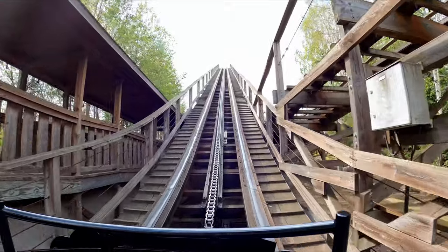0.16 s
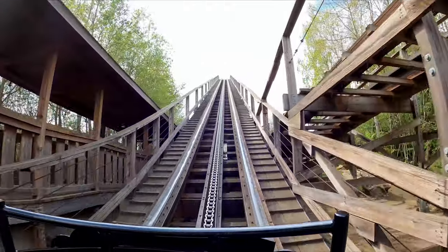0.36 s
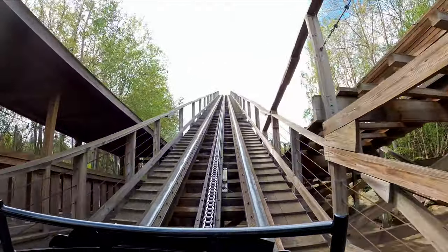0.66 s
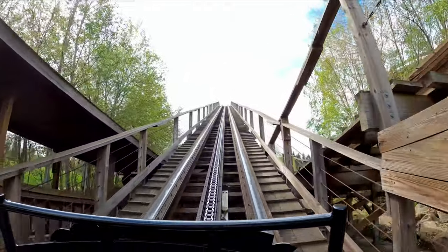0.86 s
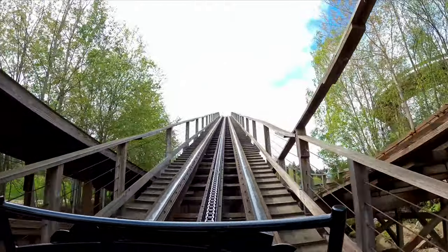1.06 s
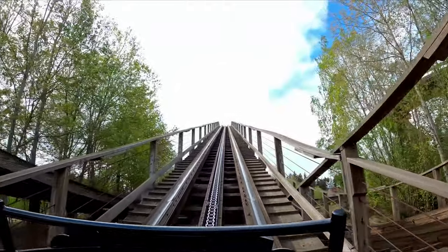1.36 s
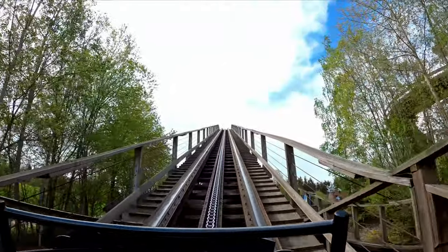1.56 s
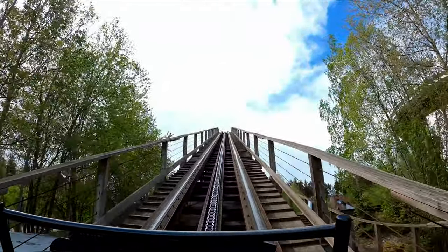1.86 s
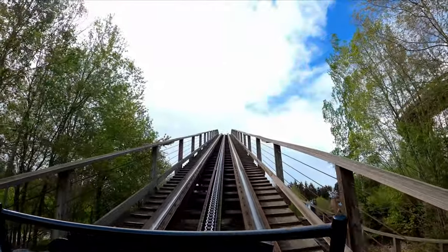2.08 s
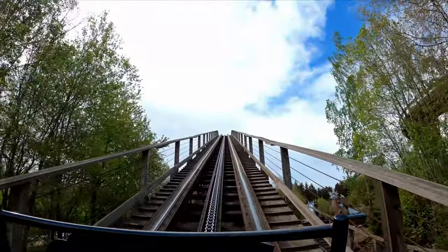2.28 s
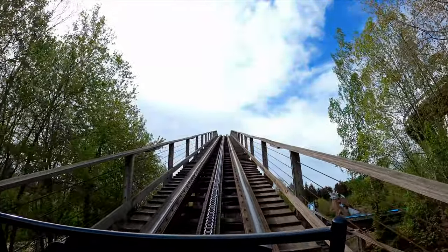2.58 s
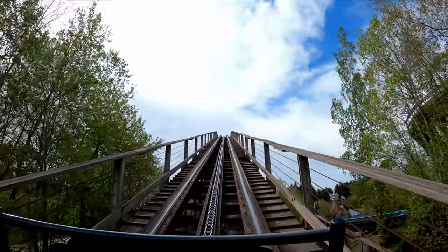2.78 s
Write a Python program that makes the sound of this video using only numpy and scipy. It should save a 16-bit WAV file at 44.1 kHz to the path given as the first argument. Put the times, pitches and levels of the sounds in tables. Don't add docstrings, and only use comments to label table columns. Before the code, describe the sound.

A wooden roller coaster car rumbles and booms over timber track with loose rattling fittings and low wind buffeting, then fast metal ratchet clacks and chain clatter take over; outdoors, close muffled onboard microphone.

```python
import sys
import numpy as np
from scipy import signal
from scipy.fft import rfft, irfft
from scipy.io import wavfile
from scipy.ndimage import uniform_filter1d, minimum_filter1d

SR = 44100
rng = np.random.default_rng(int(sys.argv[2]) if len(sys.argv) > 2 else 0)


def transcribe(signal):
    frames = np.atleast_2d(signal).T
    limited = np.clip(frames, -1, 1)
    pcm = np.round(limited * 32767).astype(np.int16)
    wavfile.write(sys.argv[1], SR, pcm)


def rack_gain(trim_db):
    fader = np.asarray(trim_db, float)
    return 10 ** (fader / 20)


N = 129213


def rows(table):
    return np.array(table, float).T


def unit(x):
    return x / np.sqrt(np.mean(x ** 2))


def curve(table):
    s, db = rows(table)
    return rack_gain(np.interp(np.arange(N) / SR, s, db))


def walk(rate_hz):
    hold = int(SR / rate_hz)
    steps = np.repeat(rng.standard_normal(N // hold + 2), hold)
    return unit(uniform_filter1d(uniform_filter1d(steps, hold), hold)[:N])


def high_pass(x, order, hz):
    return signal.sosfilt(signal.butter(order, hz, "highpass", fs=SR, output="sos"), x)


def running(f, x):
    return f(np.concatenate([x[-SR // 4:], x]))[-N:]


def colour(x, points, tilt_db=0.):
    hz, db = rows(points)
    f = np.maximum(np.arange(4097) * SR / 8192, 5)
    gain_db = np.interp(np.log(f), np.log(hz), db)
    gain_db -= 12 * np.maximum(np.log2(hz[0] / f), 0)
    gain_db += tilt_db * np.maximum(np.log2(f / 2000), 0)
    cepstrum = irfft(gain_db * np.log(10) / 20)
    cepstrum[1:4096] *= 2
    cepstrum[4097:] = 0
    return signal.fftconvolve(x, irfft(np.exp(rfft(cepstrum))))[:len(x)]


def ring(x, hz, width_hz):
    return signal.lfilter(*signal.iirpeak(hz, hz / max(width_hz, 1), SR), x)


def modes(x, table):
    out = 0
    for hz, db, t60 in table:
        flicker_db = 2 * walk(13)
        out = out + ring(x * rack_gain(db + flicker_db), hz, np.log(1000) / np.pi / t60)
    return out


def grains(rate_hz, scatter_db):
    chance, sign, size = rng.random((3, N))
    knocks = (chance < rate_hz / SR) * np.sign(sign - .5) * rack_gain(-scatter_db * np.log(size + 1e-9))
    return unit(knocks) + .5 * rng.standard_normal(N)


def blows(times, db, attack_s, decay_s):
    power = np.bincount((times * SR).astype(int), rack_gain(2 * db), N)
    for s in (attack_s, decay_s / 2):
        power = signal.lfilter([1], [1, -np.exp(-1 / (max(s, 1e-4) * SR))], power)
    return np.sqrt(power / (max(attack_s, 1e-4) * SR))


def struck(env, bright, body, table, ring_db, low_hz):
    def steel(x):
        return colour(x + rack_gain(ring_db) * modes(x, table), body)

    noise = grains(2500, 0.7)
    top = high_pass(bright * rng.standard_normal(N), 4, 5000)
    return steel(env * noise + top) / np.std(high_pass(steel(noise), 2, low_hz))


def pings(table, attack_s, decay_s, width_hz):
    noise = rng.standard_normal(N)
    out = np.zeros(N)
    for s, hz, db in table:
        note = unit(ring(ring(noise, hz, width_hz), hz, 2 * width_hz))
        out += blows(np.array([s]), np.array([db]), attack_s, decay_s) * note
    return out


def rumble():
    # t/s, level/dB
    wheel_load = [(0.0, -14), (.45, -15.5), (0.75, -14.5), (1.3, -15.5), (2.9, -17.5)]
    # f/Hz, level/dB
    timber = [(60, -4.5), (290, -5), (600, -14.5), (1100, -19.5), (2000, -32.5), (4200, -45.5), (7000, -63),
              (13000, -79.5)]
    # f/Hz, width/Hz, level/dB
    booms = [(102, 14.4, 2), (163.2, 23, -1.5), (241, 9.9, -2), (290, 4.1, 1.5), (345, 5.7, -11.5),
             (474, 19, -8.5), (975, 690, -17)]
    load = curve(wheel_load)
    low_pass = signal.butter(4, 1300, fs=SR, output="sos")
    bumps = signal.sosfilt(low_pass, grains(400, 3))
    fade_db = -4 * np.arange(N) / SR
    boom = np.zeros(N)
    for hz, width_hz, db in booms:
        gain = rack_gain(db + 2.64 * walk(9.05) + (hz < 120) * fade_db)
        boom += gain * running(lambda x: ring(x, hz, width_hz), bumps)
    uneven = rng.standard_normal(N) * rack_gain(1.37 * walk(14))
    roll = unit(running(lambda x: colour(x, timber), uneven))
    return rack_gain(-2.0) * (roll * load ** 0.61 * rack_gain(-6) + rack_gain(-4.5) * unit(boom) * load)


def wind():
    # t/s, level/dB
    gusts = [(0.0, -24), (0.12, -17.5), (.9, -21.5), (1.7, -22), (2.28, -20), (2.42, -41), (2.93, -24)]
    band = signal.butter(3, [12, 66.3], "bandpass", fs=SR, output="sos")
    buffet = signal.sosfilt(band, rng.standard_normal(N))
    return unit(buffet) * curve(gusts) * rack_gain(-4 + 4.0 * walk(7.9))


def rattles():
    # t/s, peak/dB, brightness/dB
    knocks = [(0.028, -17, -21), (0.0594, -15, -28), (0.1022, -17.5, -44), (0.1815, -28.5, -40),
              (0.2194, -25, -27), (0.2573, -20, -24), (0.31, -26, -28), (0.3421, -24, -22),
              (0.3744, -26, -17), (0.4194, -30, -14), (0.4708, -19, -32), (0.5344, -21.5, -31),
              (0.6144, -23, -23), (0.665, -25.5, -20), (0.7327, -25, -22), (0.7966, -39, -30),
              (0.8444, -37, -35), (0.95, -22, -25), (0.9744, -38, -17.5), (1.1694, -25, -25),
              (1.1894, -23, -30), (1.2244, -31, -26), (1.263, -22.5, -44)]
    # t/s, level/dB
    shake = [(0, -31.5), (.05, -54), (.17, -52), (.28, -41.5), (.4, -38), (.52, -35.5), (.6, -36.5),
             (.75, -36.5), (.82, -41), (.93, -42), (1.1, -47.5), (1.25, -42.5), (1.4, -47.5), (1.6, -40)]
    # f/Hz, level/dB
    fitting = [(1200, 1), (2100, 2), (4200, -6.5), (5000, -15.5), (6400, -24), (8500, -28.5),
               (11000, -40.5), (15000, -85.5)]
    # f/Hz, level/dB, t60/s
    fitting_modes = [(2150, 7.5, 0.051), (3900, 2.5, 0.0017), (5160, 4.5, 0.0051), (6100, 3.5, 0.011)]
    # t/s, f/Hz, peak/dB
    clear_rings = [(.028, 3900, -35.5), (.22, 2780, -34), (.256, 3850, -32.5), (.268, 3930, -38),
                   (.268, 5260, -43), (.308, 3910, -37), (.385, 3680, -32), (.42, 3960, -35),
                   (.47, 3800, -38.5), (.538, 2150, -30), (.545, 3840, -34), (.555, 5400, -37),
                   (.62, 5050, -36.5), (.631, 5180, -37), (.625, 3450, -33), (0.665, 2120, -40),
                   (.68, 2130, -34), (.73, 4100, -38), (0.955, 2630, -27.5), (.997, 3930, -40.5),
                   (1.185, 2360, -31.5), (1.2, 3900, -42), (1.265, 1920, -25.5), (1.33, 2170, -33),
                   (1.445, 3040, -27.5), (1.525, 3100, -25), (2.752, 3300, -27), (2.82, 3700, -32)]
    s, db, bright_db = rows(knocks)
    db = db - 11
    jingle = curve(shake) * rack_gain(1.03 * walk(24.47))
    env = blows(s, db, 0.0026, 0.007) + jingle
    bright = blows(s, db + bright_db + 28, 0.0061, 0.018)
    out = struck(env, bright, fitting, fitting_modes, ring_db=-5.5, low_hz=1100)
    return out + pings(clear_rings, 0.0021, 0.008, 170)


def swell(start, hz, db, rise_s):
    out = np.zeros(N)
    for s, f, gain, rise in zip(start, hz, rack_gain(db), rise_s):
        first = int(s * SR)
        t = np.arange(min(int(12 * rise * SR), N - first)) / SR
        env = (t / (2 * rise)) ** 2 * np.exp(2 - t / rise)
        out[first:][:len(t)] += gain * env * np.sin(2 * np.pi * f * t)
    return out


def joints():
    # t/s, f/Hz, peak/dB
    crossings = [(.09, 87, -20), (.18, 345, -12), (.42, 90.8, -11.5), (.63, 327, -19), (.73, 290, -7),
                 (.94, 180, -11), (.97, 262, -14), (1.03, 86, -27), (1.18, 172, -20), (1.58, 290, -12.5),
                 (1.63, 92.4, -13.5), (1.77, 568, -15.5), (1.87, 115, -12), (1.92, 290, -10.5),
                 (2.0, 73.2, -19), (2.02, 176, -33), (2.64, 155, -14), (2.72, 170.5, -9), (2.74, 223, -8.5)]
    s, hz, db = rows(crossings)
    rise_s = 1.444 / hz ** 0.65 / 8
    return swell(np.maximum(s - rise_s, 0), hz, db, rise_s)


def ticks():
    # t/s, peak/dB
    housing_ticks = [
        (.18, -65),
        (.431, -52),
        (.66, -56),
        (.953, -53),
        (.978, -56),
    ]
    s, db = rows(housing_ticks)
    return blows(s, db, .0003, .0015) * high_pass(rng.standard_normal(N), 2, 6000)


def ratchet():
    # t/s, peak/dB, brightness/dB
    clacks = [(1.42, -3, -38), (1.44, -6.5, -36), (1.4946, -6.5, -13.5), (1.519, -3, -42),
              (1.551, -7.5, -14), (1.6278, -4.5, -13), (1.6514, -4.5, -19), (1.71, -14, -26),
              (1.7344, -17, -6), (1.771, -12.5, -17), (1.8158, -8, -15), (1.8594, -1.5, -30),
              (1.9053, -11, -39), (1.9565, -5.5, -33), (2.0045, -4, -35), (2.0394, -16, -26),
              (2.0747, -2, -38), (2.1066, -16, -33), (2.1314, -11.5, -21), (2.1784, -10, -34.5),
              (2.2022, -4.5, -40), (2.2556, -9, -16.5), (2.3066, -11, -21), (2.328, -5, -20.5),
              (2.409, -6.5, -20), (2.4474, -13, -33), (2.4983, -5.5, -16), (2.548, -13, -33),
              (2.5987, -11, -11), (2.6444, -16.5, -33)]
    # t/s, peak/dB, brightness/dB
    last_clacks = [
        (2.7077, -14.5, -34),
        (2.7295, -11, -31),
        (2.7564, -23, -29),
        (2.798, -25, -21),
        (2.807, -15.5, -28),
        (2.8577, -12, -22),
    ]
    # f/Hz, level/dB
    dog = [(700, -5.5), (1450, 0.5), (3100, -11.5), (4400, -22.5), (4900, -27.5), (6500, -32), (7300, -41),
           (14000, -61)]
    steel_hz = [1000, 1250, 1410, 1620, 1902, 2126, 2520, 2880, 3260, 4255, 6350, 7970, 9380, 11100]
    # level/dB, t60/s
    steel_rings = [(-19, 0.011), (-8.5, 0.08), (6.5, 0.092), (-3.5, 0.08), (6, 0.027), (1, 0.054),
                   (-4, 0.18), (1, 0.011), (2, 0.059), (5, 0.01), (-5, 0.006), (8, 0.0078), (7, .03),
                   (-3.5, 0.033)]
    # t/s, level/dB
    chain = [(1.412, -49), (1.425, -25.5), (1.48, -25.5), (1.55, -21.5), (1.615, -26), (1.66, -21),
             (1.9, -25.5), (2.1, -26), (2.3, -23.5), (2.48, -26), (2.6, -24.5), (2.69, -25), (2.79, -32),
             (2.93, -30.5)]
    # f/Hz, level/dB
    chain_steel = [(700, -2), (1450, 1.5), (3100, -11), (4400, -23), (4900, -27.5), (6500, -28),
                   (7300, -37), (14000, -62.5)]
    steel_modes = [(hz, *level_t60) for hz, level_t60 in zip(steel_hz, steel_rings)]
    s, db, bright_db = rows(list(clacks) + list(last_clacks))
    db = db - 14.5
    env = blows(s, db, 0.003, 0.014)
    bright = blows(s, db + bright_db + 24.0, 0.0052, 0.022)
    out = struck(env, bright, dog, steel_modes, ring_db=-8.5, low_hz=1030)
    links = grains(830, 1.5) * rack_gain(1.7 * walk(22.05))
    clatter = colour(links + rack_gain(-3.5) * modes(links, steel_modes), chain_steel, tilt_db=2.0)
    return out + curve(chain) * unit(clatter)


def teeth():
    # t/s, peak/dB, f/Hz
    notes_of_teeth = [(1.4222, -10, 1420), (1.43, -15.5, 1340), (1.495, -11, 1400), (1.5195, -13, 1660),
                      (1.5497, -12.5, 1040), (1.5778, -8.5, 1210), (1.633, -10.5, 1630), (1.6566, -9, 1160),
                      (1.709, -9, 1260), (1.7324, -11, 1870), (1.7714, -11, 1700), (1.7947, -10, 1410),
                      (1.861, -9, 1060), (1.9084, -11, 1420), (1.9545, -8, 1270), (2.0048, -10.5, 1480),
                      (2.0394, -13, 1500), (2.0755, -15, 1070), (2.111, -6.5, 1390), (2.1775, -8, 1260),
                      (2.2007, -8.5, 1370), (2.2624, -9.5, 1350), (2.2904, -15, 1390), (2.307, -18, 1420),
                      (2.3283, -9, 1510), (2.398, -18, 1530), (2.4108, -11.5, 1720), (2.4433, -13.5, 1390),
                      (2.4833, -15, 993), (2.4964, -15, 1480), (2.5066, -17, 1430), (2.5396, -11, 1390),
                      (2.5734, -21, 1760), (2.6006, -8.5, 1210), (2.649, -15, 1390), (2.7093, -7.5, 1070),
                      (2.7287, -7.5, 1450), (2.7953, -12.5, 1430), (2.811, -10, 1240), (2.8238, -3.5, 1010),
                      (2.8646, -12, 1860)]
    return pings([(s, hz, db - 8) for s, db, hz in notes_of_teeth], 0.0024, 0.011, 427)


def tip():
    # t/s, peak/dB, f/Hz
    tip_rings = [(1.497, -41, 6100), (1.508, -39, 6400), (1.552, -42, 6300), (1.638, -34, 6400),
                 (1.655, -39, 6100), (1.709, -33, 6100), (1.765, -39, 6300), (2.005, -39, 6300),
                 (2.04, -42, 6260), (2.18, -39, 6240), (2.26, -40, 6200), (2.33, -41, 6200),
                 (2.415, -36.5, 6140), (2.55, -44, 6130), (2.6, -37, 6280), (2.82, -37.5, 6200)]
    return pings([(s, hz, db) for s, db, hz in tip_rings], 0.0041, 0.0059, 300)


def scene():
    steel = rattles() + ratchet() + teeth() + tip()
    t = np.arange(SR // 4) / SR
    tail = rng.standard_normal(len(t)) * np.exp(-np.log(1000) * t / 0.41) * (t > .004)
    echo = signal.fftconvolve(steel, tail / np.sqrt((tail ** 2).sum()))[:N]
    return (rumble() + wind() + steel + rack_gain(-10) * echo + joints() + ticks())[None]


def top_cut(x):
    return signal.sosfilt(signal.butter(12, 15300, fs=SR, output="sos"), x)


def record(dry):
    limit, squeeze, housing_hz = .64, 1.2, 13800
    peak = -minimum_filter1d(-np.abs(dry), size=400)
    peak = uniform_filter1d(uniform_filter1d(peak, size=300), size=300)
    held = dry / np.maximum(peak / limit, 1) ** squeeze
    dull = signal.sosfilt(signal.butter(8, housing_hz, fs=SR, output="sos"), held)
    fade = np.minimum(np.arange(N, 0, -1) / SR / .001, 1)
    return top_cut(dull * fade)


dry = scene()
out = record(dry)
transcribe(out)
```